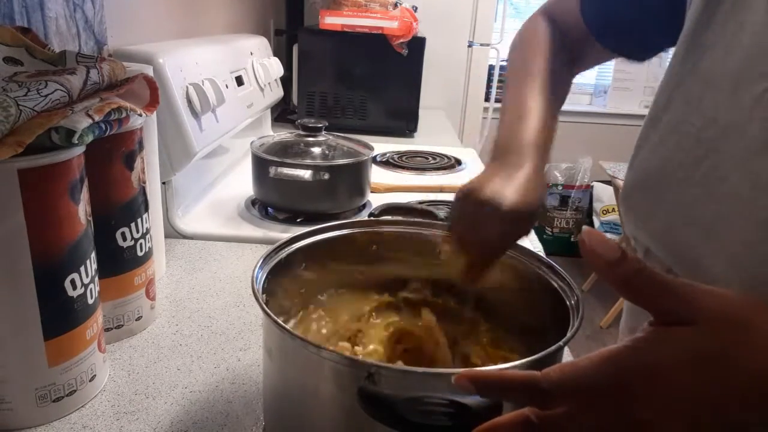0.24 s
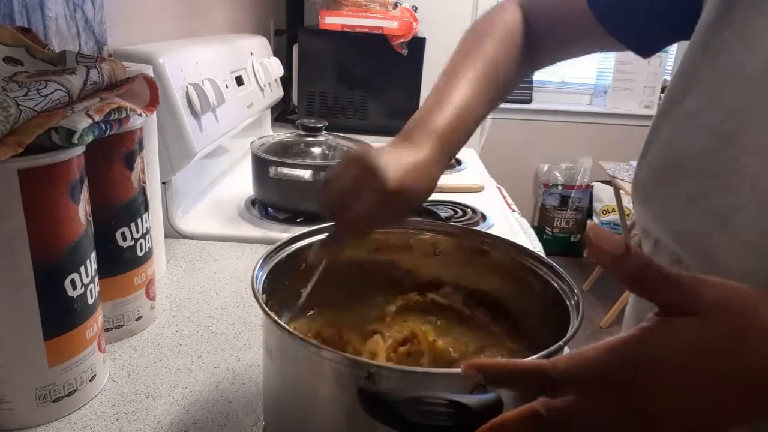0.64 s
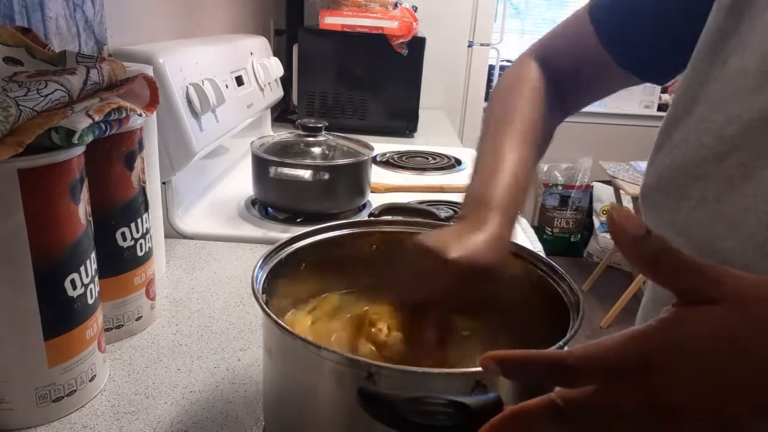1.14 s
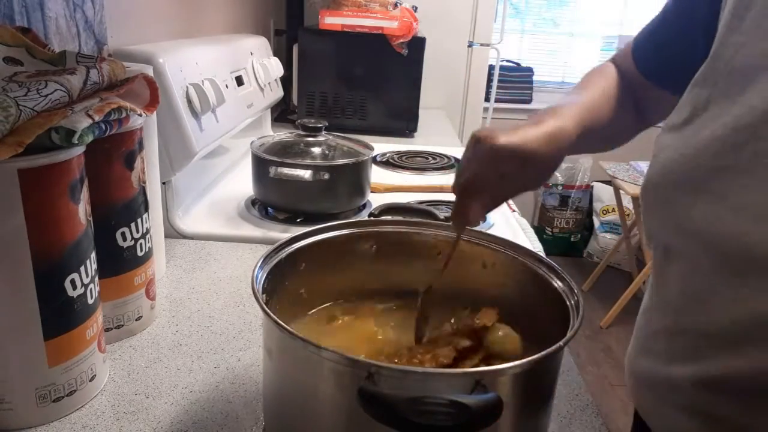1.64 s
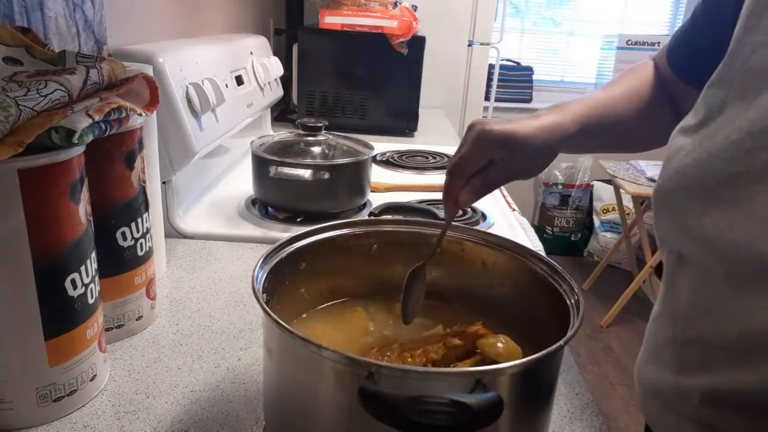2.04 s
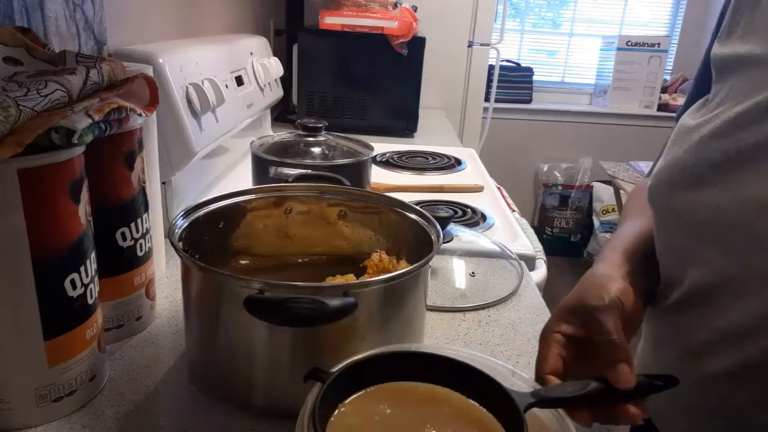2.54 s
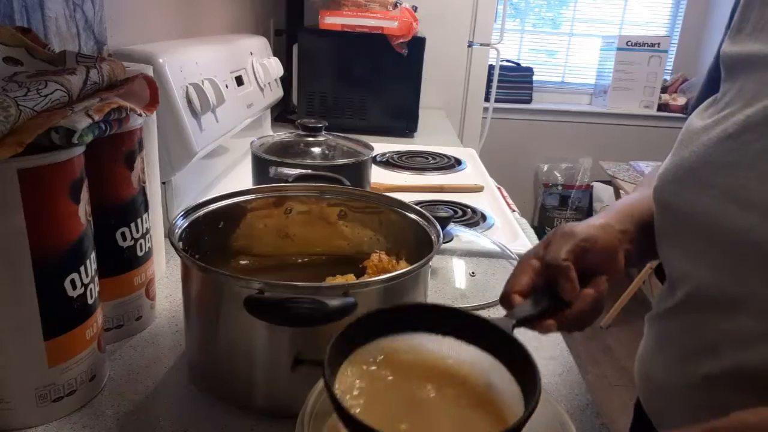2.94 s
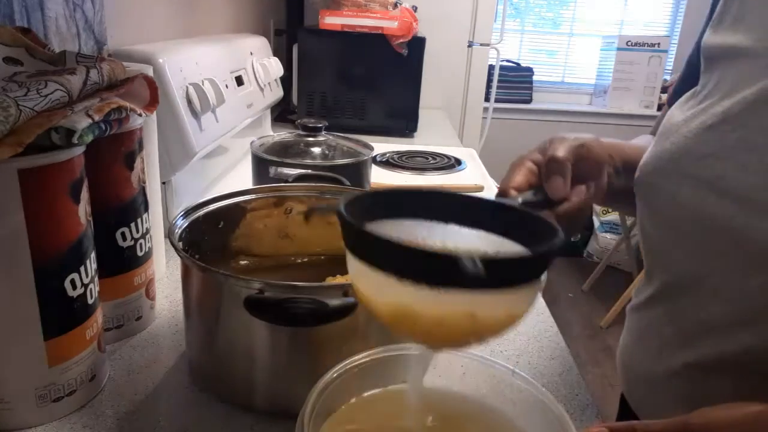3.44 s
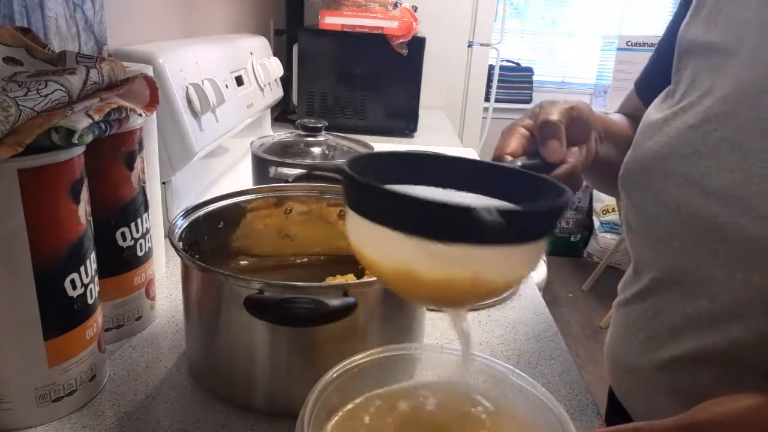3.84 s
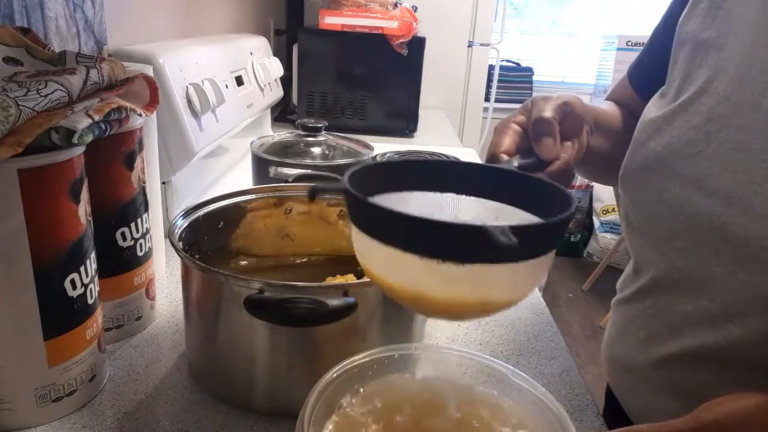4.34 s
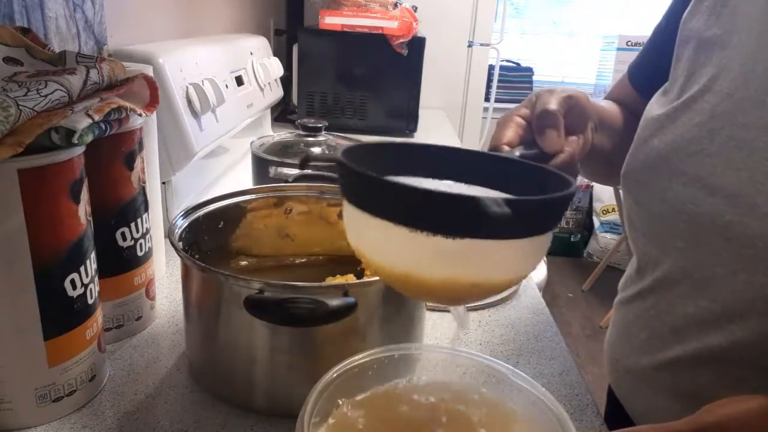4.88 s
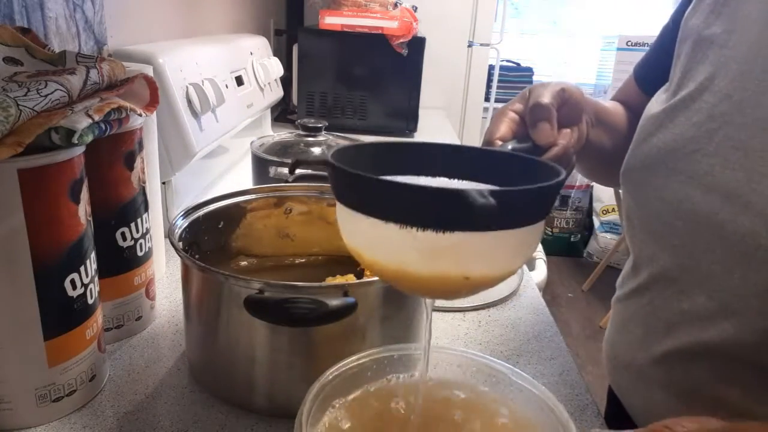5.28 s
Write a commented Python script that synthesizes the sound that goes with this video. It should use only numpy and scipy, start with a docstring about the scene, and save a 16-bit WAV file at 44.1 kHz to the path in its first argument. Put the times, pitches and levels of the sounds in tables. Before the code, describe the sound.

Brief stirring with metal knocks and wet sloshes, a short lull, then strained broth dribbling and plopping into a container.

```python
"""Stirring and straining broth

A steel spoon knocks and scrapes a pot, exciting its wall modes, while thick broth sloshes and glugs.
After a hush, liquid trickles from a mesh strainer into a plastic tub: trapped bubbles resonate as plops,
drops splash and spray fizzes. A fridge hums in the small kitchen; a two-port microphone stands close by."""
import sys
import numpy as np
from scipy import signal
from scipy.fft import rfft, irfft, next_fast_len
from scipy.io import wavfile
from scipy.ndimage import uniform_filter1d

SR = 44100
rng = np.random.default_rng(int(sys.argv[2]) if len(sys.argv) > 2 else 0)


def dump(signal):
    """Clip the signal to [-1, 1] and save it as 16-bit WAV at the path in sys.argv[1]."""
    limited = np.clip(np.atleast_2d(signal).T, -1, 1)
    pcm = np.round(limited * 32767).astype(np.int16)
    wavfile.write(sys.argv[1], SR, pcm)


N = 242991
TIME = np.arange(N) / SR

# Resolved modes of the pot wall: pitch_hz, bandwidth_hz, gain_db
POT_MODES = [(550, 13, -11), (1050, 40, -10), (1389, 31, 5), (1920, 90, 5), (2330, 30, 5), (3306, 50, -1),
             (3630, 33, -9.5), (3980, 16, -7.5), (4286, 40, -5), (5040, 45, -1), (5380, 24, -8.5),
             (5780, 70, -11), (7740, 37, -7), (7620, 41, -8.5), (8020, 59, -7.5), (8560, 25, -7),
             (9060, 36, -11.5)]
# Envelope of the steel's dense, weak modes: frequency_hz, gain_db
STEEL_SPECTRUM = [(200, -12.5), (500, -6.5), (1000, -4), (2000, -6.5), (4000, -2.5), (6500, -4),
                  (8500, -2.5), (12000, -7.5), (16000, -12)]
# Spoon contacts: start_s, level_db, rise_s, t60_s, ring_db, low_db, mid_db, high_db, thud_db, thud_hz
SPOON_KNOCKS = [(0.325, -15.5, 0.015, 0.21, -5, 3, 5.5, -0.5, -8.5, 54.5),
                (0.677, -11.5, 0.0094, 0.11, 9.5, -4, -0.5, -1.5, 2.5, 115.6),
                (.826, -8, 0.0061, 0.071, -1, -1, -1.5, -7.5, -5, 90),
                (.985, -39.5, 0.0062, 0.06, -10, -14, -5, -8, 20.5, 106),
                (1.354, -34, 0.0074, 0.11, 8, 0, 5, -7, -3, 90),
                (1.485, -46.5, 0.0019, .08, 5.5, -13.5, 2, -3.5, 4, 89.6)]


def spoon(carrier):
    """Modal excitation: each knock is a short skid of clicks that rings the part of the wall it touches."""
    out, t = np.zeros((2, N)), np.arange(int(.35 * SR)) / SR
    skid = grit(carrier, 2.9, 0.009, grain_s=0.0021)
    edges_hz = (2600, 6000)  # between low, mid and high modes
    for start, db, rise, t60, ring_db, low_db, mid_db, high_db, thud_db, thud_hz in SPOON_KNOCKS:
        force = np.minimum(t / rise, 1) * undb(db - 60 * np.maximum(t - rise, 0) / t60)
        contact = excerpt(skid, start, len(t)) * force
        wall_db = (low_db, mid_db, high_db)
        modes = [(hz, width, gain + wall_db[np.searchsorted(edges_hz, hz)])
                 for hz, width, gain in POT_MODES]
        dense = colour(colour(contact, STEEL_SPECTRUM), [(1500, low_db), (4000, mid_db), (9000, high_db)])
        thud = band(force * rng.standard_normal(len(t)), thud_hz / 2, thud_hz * 1.6)
        thud = band(thud, thud_hz / 2.2, thud_hz * 2)
        ringing = undb(ring_db) * modal_sum(contact, modes)
        add(out, start, ringing + undb(-1.5) * dense + undb(thud_db) * thud)
    return out


# Broth moved by the spoon, one curve per slosh: time_s, level_db, treble_db
SLOSH_CURVES = [
    [(0.0, -71, 1), (0.05, -80, 0)],
    [(0.12, -77, -2), (0.17, -67, 8.5), (0.2, -69, 14.5), (0.27, -88, 11)],
    [(0.38, -46, -28), (0.46, -60.5, 11), (0.535, -60, -1.5), (0.62, -87.5, -12)],
    [(0.72, -55, 15), (0.755, -44, -4), (0.82, -58.5, 6.5)],
    [(0.86, -38.5, 0.5), (0.9, -48.5, 6), (0.95, -42, -5.5), (0.99, -53.5, -3), (1.05, -54, 4.5),
     (1.1, -41.5, -8.5), (1.14, -52.5, -5), (1.2, -61.5, 2.5), (1.26, -64, 0.5), (1.3, -80, 4.5)],
    [(1.39, -53, 0), (1.43, -61.5, -2), (1.47, -86, 4), (1.54, -74.5, -1), (1.62, -88, 14.5),
     (1.72, -81.5, 9), (1.76, -91, 1)],
]


def broth(carrier):
    """Forced vibration: sloshing noise drives the pot's lower modes, with froth, hiss and a low swash."""
    level, treble = curves(SLOSH_CURVES)
    wet = grit(carrier, 8.7, 0.0051, grain_s=0.0091) * flicker(30, 2.2)
    wall = modal_sum(wet, [(hz, 0.2 * width, db) for hz, width, db in POT_MODES if hz < 4000])
    cloud = bubble_cloud(0, 1.5, count=500, lo_hz=501, octaves=3.2, cycles=56, climb=1)
    froth = damped_sines(cloud, glide=0.29, rise_s=0.00092, rough=0.1)
    body = unit(unit(band(wet, 600, 4500)) + 0.55 * unit(wall) + 0.3 * unit(froth))
    hiss = unit(band(carrier[:, ::-1], 4500, 20000)) * flicker(70, 4.2)
    swash = unit(band(rng.standard_normal(N), 70, 300))
    return level * (body + treble * hiss + undb(-14.5) * swash)


def glug(carrier, start_s=1.078, level_db=-31.5, pitch_hz=533):
    """Cavity resonance: an air pocket closes behind the spoon; its pitch holds, then climbs as it shrinks."""
    attack_s, hold_s, t60_s = .012, 0.035, 0.015
    shrink_s, octaves_per_s = 0.017, 40
    t = TIME - start_s
    hz = pitch_hz * 2 ** np.clip(octaves_per_s * (t - shrink_s), 0, 2)
    fade = np.clip(t / attack_s, 0, 1) * undb(level_db - 60 * np.maximum(t - attack_s - hold_s, 0) / t60_s)
    dip = undb(-11 * np.exp(-((t - 0.0213) / .004) ** 2))  # the pocket splits
    pocket = np.sin(2 * np.pi * np.cumsum(hz * flicker(150, .3)) / SR)
    rough = 1 + .5 * unit(band(rng.standard_normal((2, N)), 50, 300))
    rasp = 0.077 * pocket ** 2 * unit(band(carrier, 600, 3000))
    return (pocket + rasp) * rough * fade * dip


# Resonances of the plastic tub: pitch_hz, bandwidth_hz, gain_db
TUB_MODES = [(1010, 1060, -6.5), (1456, 106, 7), (1964, 180, 3), (2870, 500, 2), (3550, 590, 4.5),
             (5140, 1040, -4.5)]
# Stream falling into the tub: time_s, level_db
STREAM_CURVE = [(3.44, -68), (3.55, -64.5), (3.68, -47.5), (3.76, -46.5), (3.92, -50), (4.06, -63.5),
                (4.16, -48), (4.25, -58.5), (4.55, -50), (4.64, -65), (4.72, -57.5), (4.88, -55.5),
                (4.96, -60.5), (5.04, -54), (5.12, -59.5), (5.28, -64.5), (5.36, -88)]


def trickle(carrier):
    """Air entrainment: the stream drags bubbles under, sheds spray and excites the tub's resonances."""
    level, = curves([STREAM_CURVE])
    tub = unit(modal_sum(carrier, TUB_MODES))
    mist = bubble_cloud(4.1, 5.3, count=1100, lo_hz=4844, octaves=1.8, cycles=160, climb=0.91)
    spray = damped_sines(mist, glide=0.16, rise_s=0.000087, rough=0.15)
    fizz = unit(unit(band(carrier[:, ::-1], 5000, 15500)) + .6 * unit(spray))
    # as the stream thins, the share of fizz grows and the largest bubbles rise in pitch
    treble = undb(-14.5 + 7 * (TIME - STREAM_CURVE[0][0]))
    cloud = bubble_cloud(3.46, 5.3, count=450, lo_hz=561.4, octaves=3.1, cycles=40, climb=2.2)
    gurgle = damped_sines(cloud, glide=0.063, rise_s=0.00077, rough=0.38)
    patter = np.abs(grit(np.ones(N), 6.2, .001, grain_s=.002)) * flicker(60, 3.55)
    stream = level * (patter * (undb(-5.5) * tub + treble * fizz) + undb(-3.5) * unit(gurgle))
    # while thick, it drags down large pockets that burble low
    pockets = bubble_cloud(3.58, 4.05, count=60, lo_hz=400, octaves=1.1, cycles=30, climb=1.2)
    burble = damped_sines(pockets, glide=.08, rise_s=.002, rough=.4)
    return stream + undb(-51) * burble + splashes(carrier, tub, fizz)


# Drops bursting on the surface: start_s, level_db, tub_db, t60_s
DROP_IMPACTS = [(3.492, -56, 0, 0.24), (3.522, -51, 3.5, 0.14), (3.535, -45.5, 1.5, 0.18),
                (3.575, -50, 16, 0.058), (3.598, -42, -7, 0.043), (3.624, -49, -26, 0.088),
                (3.665, -49, 0, 0.24), (3.696, -36, -7, 0.048), (3.736, -37.5, -6, 0.03),
                (3.7695, -45, -1.5, 0.2), (3.799, -44.5, 6.5, 0.052), (3.859, -44, -12, 0.039),
                (3.8967, -32.5, -14, 0.071), (3.929, -45, 2.5, 0.2), (3.945, -34, -0.5, 0.055),
                (3.975, -43, -6, 0.2), (4.032, -39, 2, 0.051), (4.085, -38, -8, 0.073),
                (4.112, -47, 5.5, 0.055), (4.178, -46.5, -3, 0.063), (4.239, -42.5, -12, 0.059),
                (4.271, -52, 1, 0.22), (4.375, -46.5, 3, 0.12), (4.408, -47, 10, 0.029),
                (4.42, -42.5, -17, 0.059), (4.449, -46, -6, 0.11), (4.506, -43, -2, 0.054),
                (4.551, -44.5, 5.5, 0.05), (4.588, -47.5, 0, 0.05), (4.635, -43, -4.5, 0.13),
                (4.699, -40, -5.5, 0.051), (4.754, -58, 11.5, 0.046), (4.842, -50.5, 0, 0.1),
                (4.898, -54, 3.5, 0.043), (4.929, -54.5, 0.5, 0.12), (5.023, -52, -6, 0.25),
                (5.129, -36.5, -9, 0.096), (5.197, -52, -6, 0.054), (5.238, -49, 7, 0.08)]


def splashes(carrier, tub, fizz):
    """Impact transients: each drop gives a sharp crack, then the slower decay of a spreading splash."""
    out, t = np.zeros((2, N)), np.arange(int(.15 * SR)) / SR
    bass = unit(band(carrier, 40, 325))
    attack = np.minimum(t / 0.00055, 1)
    crack = 0.59 * undb(-60 * t / 0.0048)
    for start, db, tub_db, t60 in DROP_IMPACTS:
        burst = excerpt(fizz + undb(tub_db) * tub + undb(-19.5) * bass, start, len(t))
        add(out, start, burst * attack * (crack + undb(-60 * t / t60)) * undb(db))
    return out


# Bubble plops and short pitched drip clicks; rows starting together sound as one click:
# start_s, pitch_hz, level_db, t60_s
PLOPS_AND_CLICKS = [(0.15, 1586, -55.5, 0.06), (0.881, 966, -31, 0.057), (0.888, 1710, -34, 0.11),
                    (0.921, 1260, -29.5, 0.024), (0.926, 2200, -27.5, 0.019), (0.933, 2840, -29.5, 0.015),
                    (0.942, 635, -41, 0.11), (0.951, 2800, -34, 0.024), (0.993, 1375, -33, 0.032),
                    (1.131, 2200, -40.5, 0.048), (1.144, 902, -42, 0.049), (1.162, 975, -40, 0.021),
                    (3.468, 1760, -51, 0.071), (3.491, 977, -42.5, 0.14), (3.529, 3380, -21, 0.013),
                    (3.574, 2180, -23, 0.0074), (3.574, 3770, -21, 0.012), (3.589, 575, -34.5, 0.056),
                    (3.59, 1430, -39, 0.076), (3.638, 2040, -37.5, 0.034), (3.663, 973, -43.5, 0.26),
                    (3.675, 510, -32.5, 0.027), (3.697, 3460, -23, 0.015), (3.772, 1730, -35.5, 0.082),
                    (3.776, 961, -24.5, 0.094), (3.792, 1440, -23, 0.025), (3.801, 664, -27, 0.036),
                    (3.843, 3620, -31, 0.017), (3.866, 848, -36.5, 0.037), (3.893, 591, -28.5, 0.033),
                    (3.937, 4140, -37, 0.056), (3.944, 1710, -21.5, 0.016), (3.945, 1002, -33.5, 0.061),
                    (3.959, 1123, -34.5, 0.06), (4.02, 3630, -31.5, 0.018), (4.061, 1306, -30.5, 0.025),
                    (4.087, 718, -32, 0.045), (4.132, 990, -32, 0.024), (4.179, 687, -22.5, 0.028),
                    (4.271, 3510, -26.5, 0.014), (4.273, 694, -29, 0.04), (4.285, 1490, -33.5, 0.05),
                    (4.306, 4450, -26.5, 0.028), (4.377, 813, -34, 0.057), (4.41, 1435, -28, 0.029),
                    (4.411, 2810, -38, 0.084), (4.426, 3470, -27, 0.019), (4.428, 2870, -32, 0.039),
                    (4.454, 827, -25, 0.049), (4.505, 3070, -32, 0.015), (4.507, 1378, -35, 0.063),
                    (4.555, 795, -33, 0.058), (4.574, 2860, -29, 0.018), (4.635, 3860, -31, 0.015),
                    (4.639, 865, -35, 0.052), (4.684, 3500, -27.5, 0.019), (4.7, 1914, -43, 0.062),
                    (4.731, 1490, -40.5, 0.05), (4.745, 917, -39.5, 0.14), (4.836, 1035, -40.5, 0.15),
                    (4.99, 1450, -43.5, 0.16), (5.002, 1695, -36, 0.029), (5.028, 1095, -32, 0.091),
                    (5.056, 2900, -27.5, 0.029), (5.127, 3600, -37, 0.017), (5.129, 1502, -40, 0.052),
                    (5.129, 5820, -14.5, 0.009), (5.198, 1730, -38, 0.04), (5.223, 3200, -24.5, 0.017),
                    (5.24, 1373, -32.5, 0.042)]


def plops_and_clicks():
    """Damped resonance: trapped air rings as a plop; the briefest tones are heard as drip clicks."""
    return damped_sines(PLOPS_AND_CLICKS, glide=0.117, rise_s=.0011, rough=0.36)


# Thin squeaks after the stirring: start_s, pitch_hz, level_db, t60_s
SQUEAK_TONES = [(1.655, 12400, -58, .06), (1.682, 12380, -51, .12), (1.665, 8330, -70, .1),
                (1.715, 1750, -70, .06)]


def squeaks():
    """Damped oscillation: faint, mostly very high tones die away at nearly constant pitch."""
    return damped_sines(SQUEAK_TONES, glide=.001, rise_s=.006, rough=.3)


# Strainer and tub being handled, one curve per movement: time_s, level_db
RUSTLE_CURVES = [
    [(2.32, -92.5), (2.35, -74), (2.39, -90)],
    [(2.75, -95), (2.79, -74.5), (2.9, -84), (3.05, -81.5), (3.12, -71.5), (3.19, -77), (3.28, -73.5),
     (3.34, -82), (3.4, -77), (3.46, -87)],
]
# Dull plastic ticks: start_s, level_db
PLASTIC_TICKS = [(2.7805, -61), (2.9356, -64.5), (3.0567, -53), (3.1136, -52), (3.1997, -59.5),
                 (3.2275, -53.5), (3.2445, -55.5), (3.2956, -58), (3.4067, -59)]


def handling(carrier, tick_hz=2180, tick_t60_s=0.03):
    """Friction and light impact: grainy rustle and short snaps pass through broad resonances."""
    level, = curves(RUSTLE_CURVES)
    rub = grit(carrier, 4, .001, grain_s=.002)
    body = unit(band(rub, 830, 4540) + 1.7 * ring(rub, 1990, 400))
    treble = unit(band(rub[:, ::-1], 3300, 10800))
    out = level * (body + undb(-4) * treble)
    t = np.arange(int(.04 * SR)) / SR
    for start, db in PLASTIC_TICKS:
        snap = excerpt(carrier, start, len(t)) * undb(db - 60 * t / tick_t60_s)
        add(out, start, 2.9 * ring(snap, tick_hz, 296) + .5 * band(snap, 900, 11000))
    return out


def room(near, t60_s=.2, length_s=0.17):
    """Reverberation: convolution with decaying noise of unit energy gives each port a diffuse tail."""
    t = np.arange(int(length_s * SR)) / SR
    response = rng.standard_normal((2, len(t))) * undb(-60 * t / t60_s)
    response /= np.sqrt(np.sum(response ** 2, axis=1, keepdims=True))
    return signal.fftconvolve(band(near, 300, 10000), response, axes=1)[:, :N]


# Compressor hum: time_s, level_db
HUM_CURVE = [(0.0, -54.5), (3.31, -52.5), (3.76, -49.5), (5.51, -52.5)]


def fridge(hum_hz=59.5, whine_hz=9213):
    """Periodic vibration: the compressor hums with a wavering overtone at 2.06 times its pitch and a brief
    whine."""
    level = undb(np.interp(TIME, *np.transpose(HUM_CURVE)))
    phase = 2 * np.pi * hum_hz * TIME
    hum = flicker(8, 1.2) * np.sin(phase) + undb(-20.5) * flicker(6, 3) * np.sin(2.06 * phase)
    whine_on = (TIME > 1.74) * (TIME < 2.38)
    whine = whine_on * undb(-83) * flicker(20, 2) * np.sin(2 * np.pi * whine_hz * TIME)
    return np.sqrt(2) * (level * hum + whine)


# Spectral shape of kitchen air and microphone hiss: frequency_hz, gain_db
AIR_SPECTRUM = [(25, 0.5), (60, 9), (125, -0.5), (190, -13), (590, -22), (800, -25.5), (2500, -33),
                (5500, -38.5), (7500, -30.5), (9000, -21.5), (12000, -32.5), (16000, -32.5)]


def air(mid_db=-63, drone_hz=600):
    """Stationary noise: a floor with a faint drone, coherent between the ports mainly in the bass."""
    floor = colour(rng.standard_normal((2, N)), AIR_SPECTRUM)
    mid, side = floor + 1.3 * ring(floor, drone_hz, 37)
    side = colour(side, [(60, -9.5), (300, -4.5), (1000, 0.5)])
    return undb(mid_db) / np.std(mid) * np.array([mid + side, mid - side])


# Likeness of the two microphone ports: frequency_hz, correlation_ratio
PORT_COHERENCE = [(60, 0.94), (300, 0.5), (1400, 0.5), (3100, .25), (6000, 0.05)]


def port_noise():
    """Spatial coherence: noise alike at both ports in the bass and nearly unrelated in the treble."""
    hz, like = np.transpose(PORT_COHERENCE)
    mid = colour(rng.standard_normal(N), np.transpose([hz, 10 * np.log10((1 + like) / 2)]))
    side = colour(rng.standard_normal(N), np.transpose([hz, 10 * np.log10((1 - like) / 2)]))
    return np.array([mid + side, mid - side])


def bubble_cloud(start_s, end_s, count, lo_hz, octaves, cycles, climb):
    """Random process: bubbles of random time, pitch and level; the lowest pitch drifts by a factor climb."""
    when, pitch, strength, life = rng.random((count, 4)).T
    lowest = lo_hz * climb ** when
    hz = lowest * (lo_hz * 2 ** octaves / lowest) ** pitch
    level_db = 3 * np.log(strength) + 8 * pitch
    return np.transpose([start_s + (end_s - start_s) * when, hz, level_db, cycles * (.5 + life) / hz])


def damped_sines(rows, glide, rise_s, rough):
    """Free decay: sines glide upward and flutter in level, each with its own stereo phase and balance."""
    out = np.zeros((2, N))
    flutter = 1 + rough * unit(band(rng.standard_normal(N), 66, 210))
    sides = np.array([[.5], [-.5]])
    for (start, hz, db, t60), (pan, lag) in zip(rows, rng.uniform(-0.62, 1, (len(rows), 2))):
        t60 = max(t60, .002)
        t = np.arange(int(t60 * SR)) / SR
        shape = (1 - np.exp(-t / rise_s)) ** 2 * undb(db - 60 * t / t60 + 4.7 * pan * sides)
        phase = 2 * np.pi * hz * (t + glide * t ** 2 / t60 / 2)
        add(out, start, shape * (np.sin(phase) + 3 * lag * sides * np.cos(phase)))
    return out * flutter


def grit(carrier, spread_db, share, grain_s):
    """Shot-noise modulation: scattered, decaying grains lift the carrier; rms 1."""
    grain_db = (rng.random(N) < share) * spread_db * np.minimum(rng.exponential(size=N), 2)
    grains = signal.lfilter([1], [1, -np.exp(-1 / (grain_s * SR))], undb(grain_db) - 1)
    return unit(carrier * (1 + grains))


def flicker(rate_hz, depth_db):
    """Random modulation: a factor that wanders in decibels."""
    hold = int(SR / rate_hz)
    steps = np.repeat(rng.standard_normal(N // hold + 1), hold)[:N]
    return undb(depth_db * uniform_filter1d(steps, hold))


def curves(tables):
    """Envelopes: decibel columns become gains over time, the first silent between curves."""
    rows = np.vstack(tables)
    on = sum((TIME >= table[0][0]) & (TIME <= table[-1][0]) for table in tables)
    gate = uniform_filter1d(1. * on, size=400)
    level, *rest = (undb(np.interp(TIME, rows[:, 0], column)) for column in rows.T[1:])
    return [gate * level] + rest


def modal_sum(x, modes):
    """Superposition of resonances with alternating polarity."""
    return sum((-1) ** j * undb(db) * ring(x, hz, width) for j, (hz, width, db) in enumerate(modes))


def ring(x, hz, width_hz):
    """Second-order resonance, gain 1 at its centre."""
    return signal.lfilter(*signal.iirpeak(hz, hz / max(width_hz, 5), fs=SR), x)


def band(x, lo_hz, hi_hz):
    """Causal band-pass."""
    return signal.sosfilt(signal.butter(2, [lo_hz, hi_hz], "bandpass", fs=SR, output="sos"), x)


def colour(x, points):
    """Zero-phase filter through (frequency_hz, gain_db) points."""
    hz, db = np.transpose(points)
    size = next_fast_len(x.shape[-1])
    bins_hz = np.fft.rfftfreq(size, 1 / SR) + 1
    gain = undb(np.interp(np.log(bins_hz), np.log(hz), db))
    return irfft(rfft(x, size) * gain, size)[..., :x.shape[-1]]


def excerpt(x, start_s, samples):
    """A short stretch of a stereo signal."""
    return x[:, int(start_s * SR):int(start_s * SR) + samples]


def add(out, start_s, sound):
    """Superpose a short sound at start_s."""
    target = excerpt(out, start_s, sound.shape[-1])
    target += sound[..., :target.shape[-1]]


def undb(db):
    """Decibels to gain."""
    return 10 ** (np.asarray(db, float) / 20)


def unit(x):
    """Scale to rms 1."""
    return x / np.sqrt(np.mean(x ** 2))


# Level difference between the ports: frequency_hz, left_minus_right_db
PORT_BALANCE = [(60, -1), (700, -4), (1300, -0.5), (2400, -2.5), (8000, -0.5)]


def scene():
    """Superposition: direct sound with a brief diffuse tail, over hum and air that lean to the right."""
    carrier = port_noise()
    near = spoon(carrier) + broth(carrier) + glug(carrier) + handling(carrier) + trickle(carrier)
    near = near + plops_and_clicks() + squeaks()
    whole = near + undb(-12) * room(near)
    ports = [colour(port, [(hz, db * side) for hz, db in PORT_BALANCE])
             for port, side in zip(whole, (.5, -.5))]
    return np.array(ports) + (fridge() + air()) * undb([[-1.5], [1.5]])


def record(dry, cutoff_hz=15900):
    """Band limiting: a steep elliptic low-pass removes the top of the treble."""
    return signal.sosfilt(signal.ellip(10, .2, 80, cutoff_hz, fs=SR, output="sos"), dry)


dry = scene()
out = record(dry)
dump(out)
```